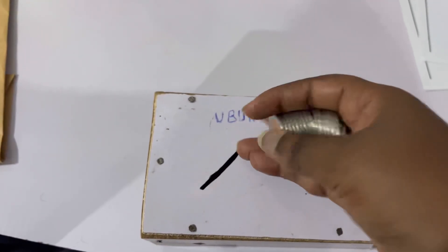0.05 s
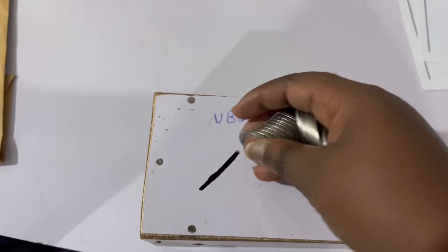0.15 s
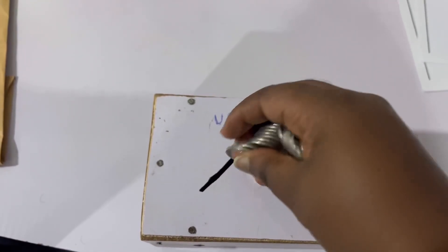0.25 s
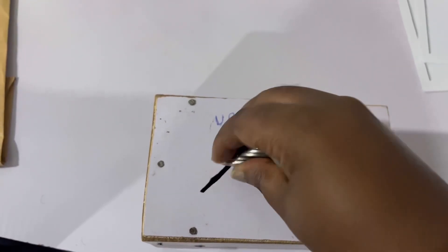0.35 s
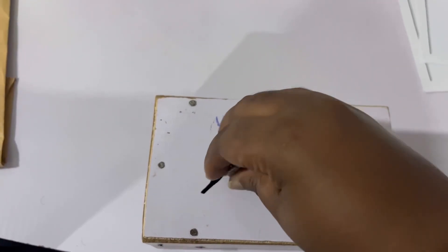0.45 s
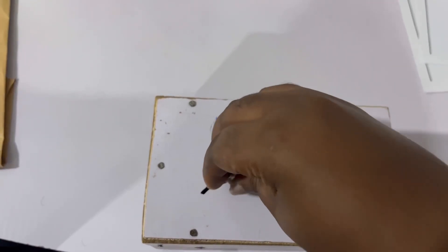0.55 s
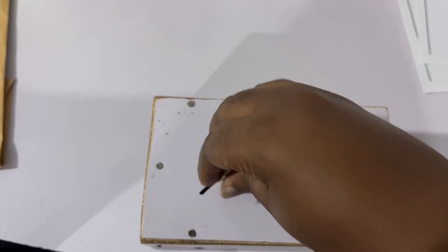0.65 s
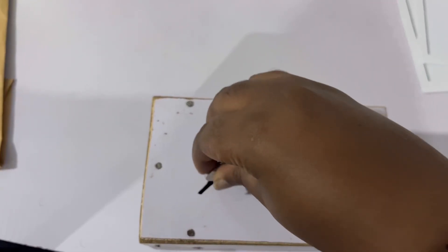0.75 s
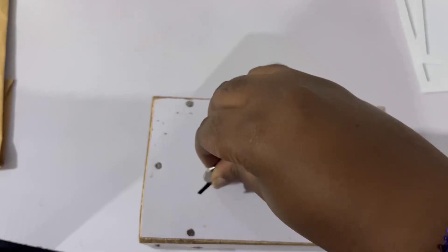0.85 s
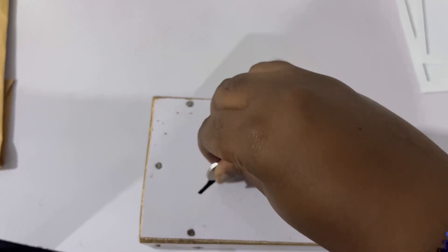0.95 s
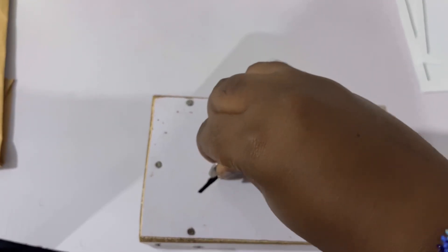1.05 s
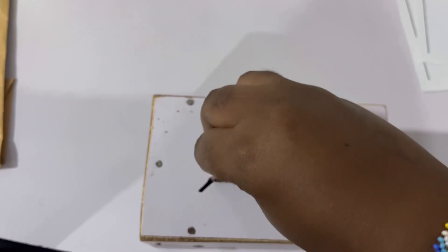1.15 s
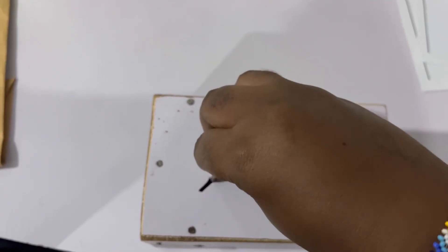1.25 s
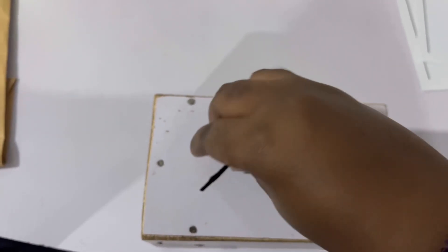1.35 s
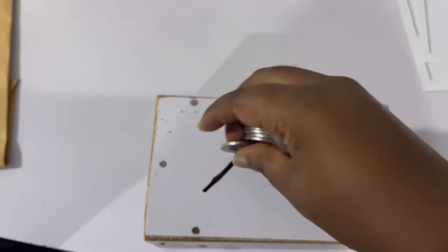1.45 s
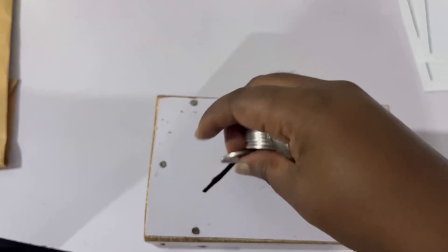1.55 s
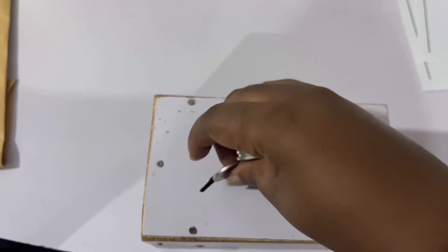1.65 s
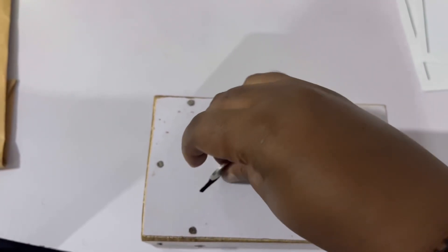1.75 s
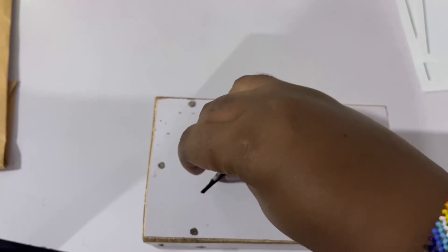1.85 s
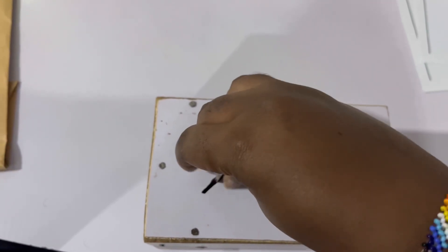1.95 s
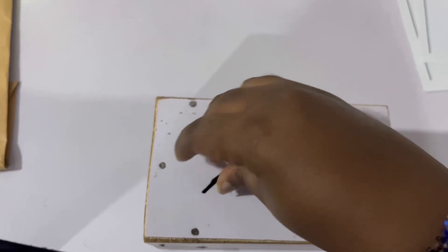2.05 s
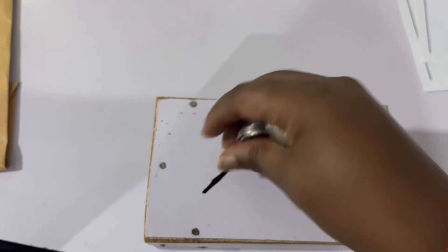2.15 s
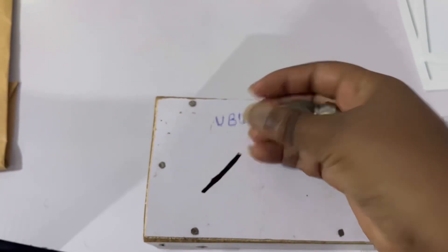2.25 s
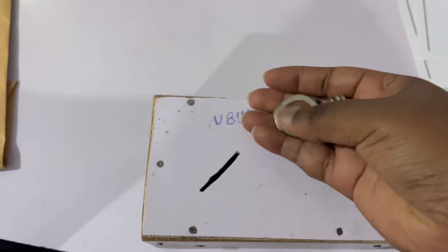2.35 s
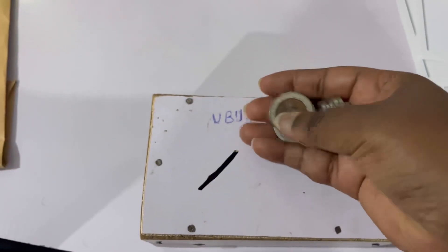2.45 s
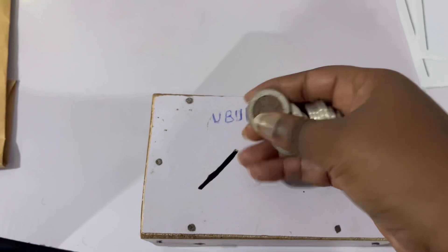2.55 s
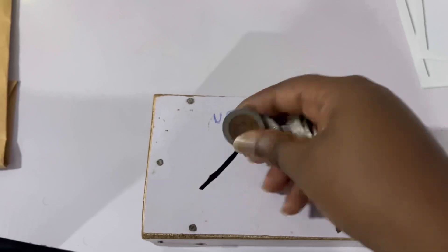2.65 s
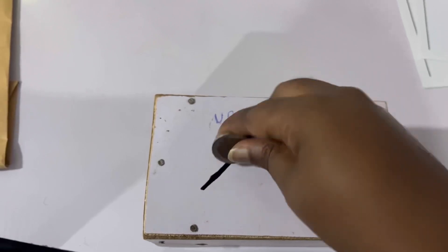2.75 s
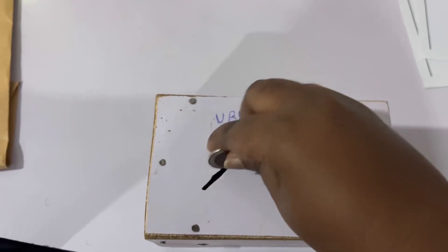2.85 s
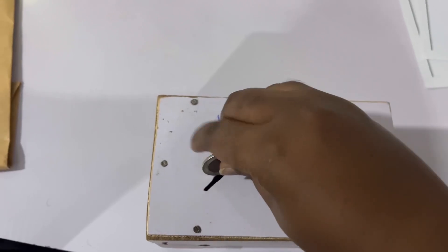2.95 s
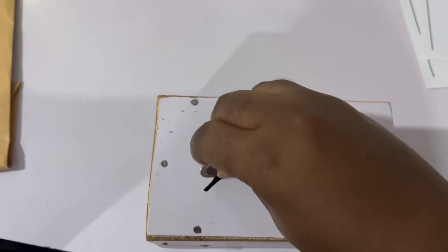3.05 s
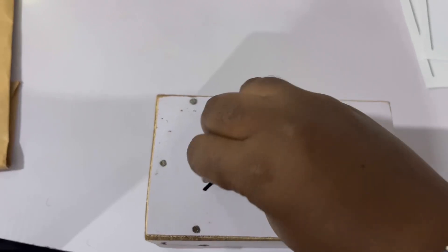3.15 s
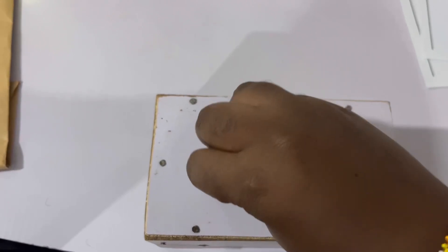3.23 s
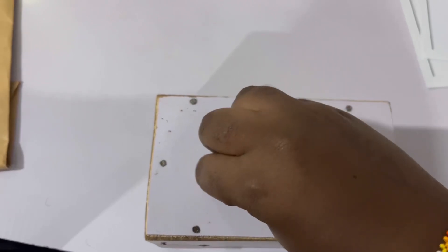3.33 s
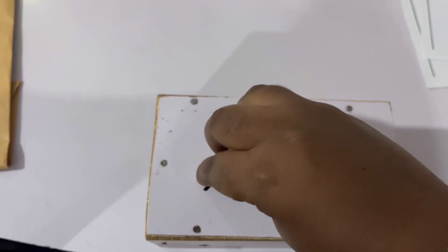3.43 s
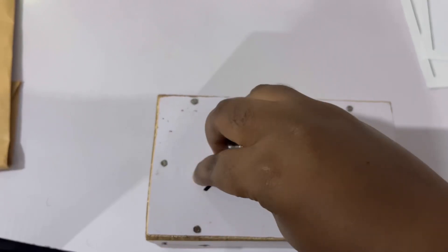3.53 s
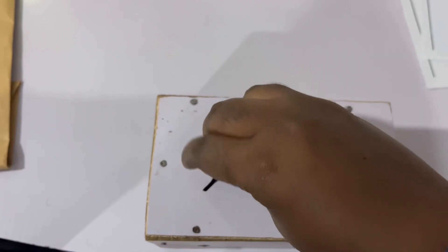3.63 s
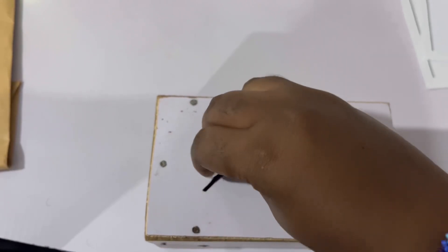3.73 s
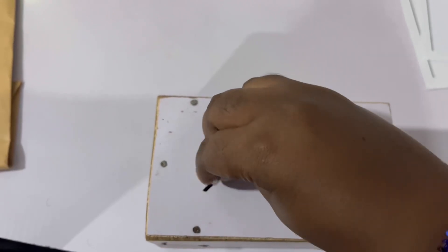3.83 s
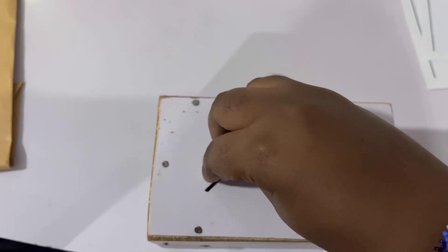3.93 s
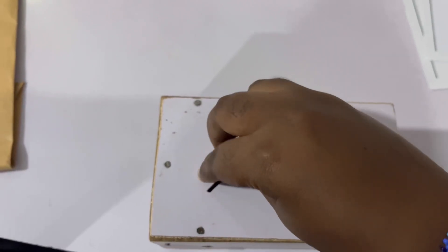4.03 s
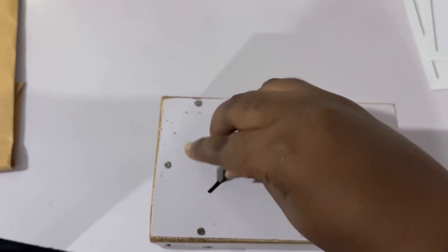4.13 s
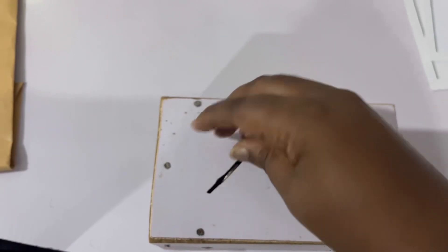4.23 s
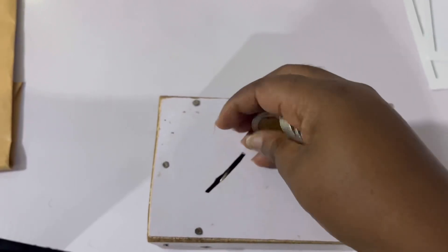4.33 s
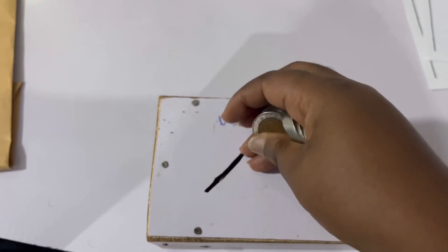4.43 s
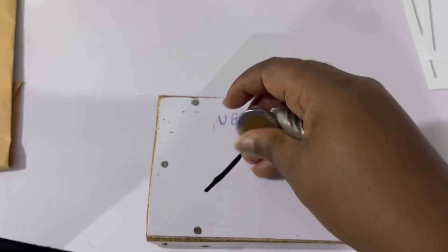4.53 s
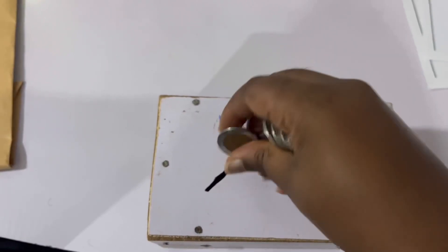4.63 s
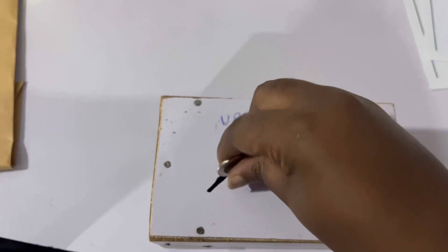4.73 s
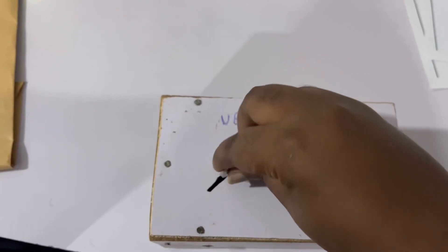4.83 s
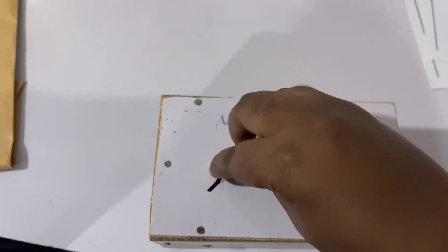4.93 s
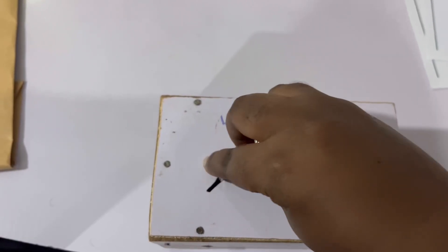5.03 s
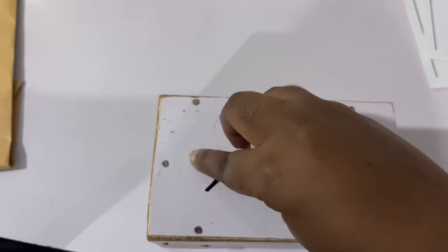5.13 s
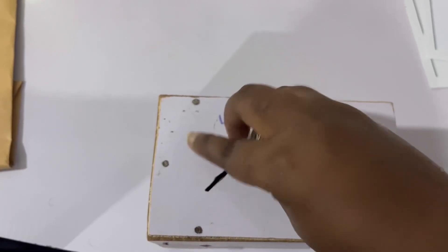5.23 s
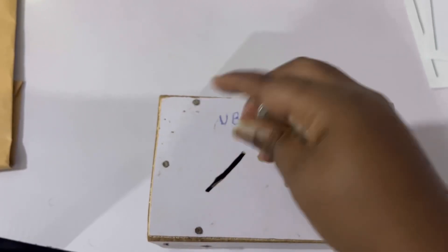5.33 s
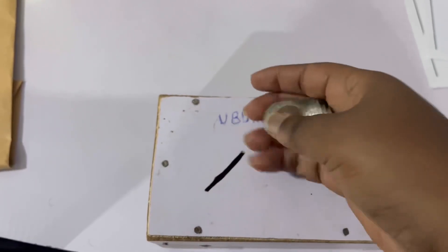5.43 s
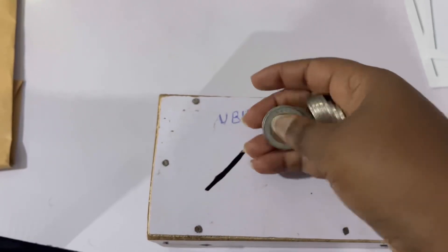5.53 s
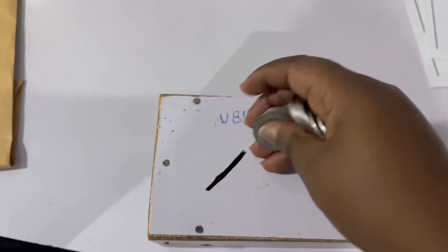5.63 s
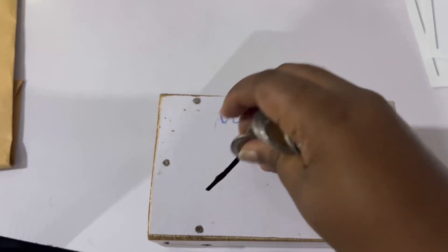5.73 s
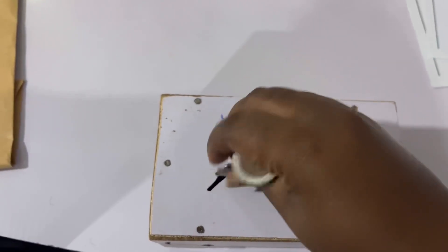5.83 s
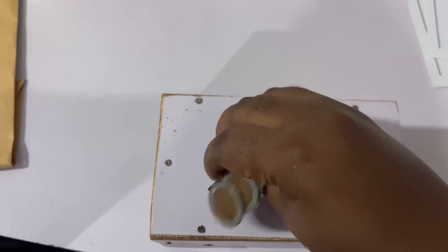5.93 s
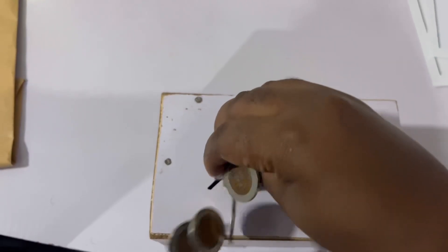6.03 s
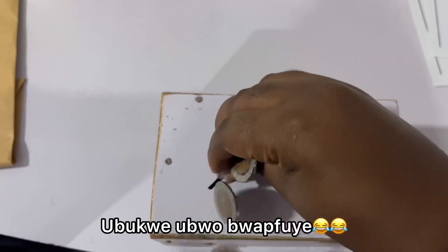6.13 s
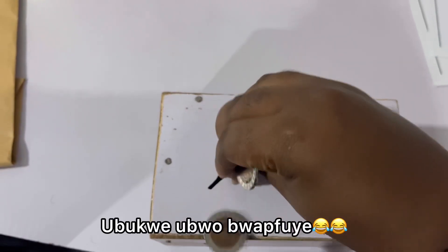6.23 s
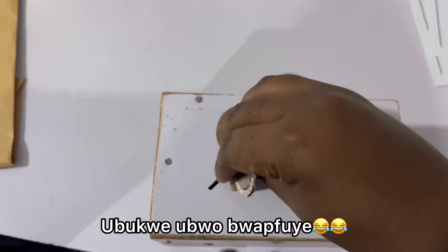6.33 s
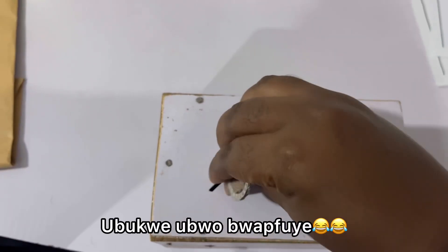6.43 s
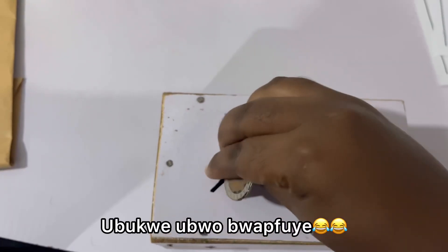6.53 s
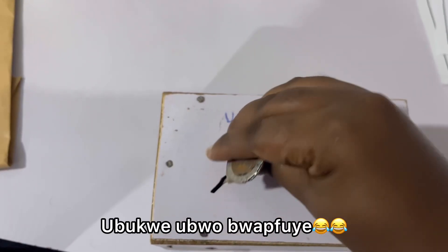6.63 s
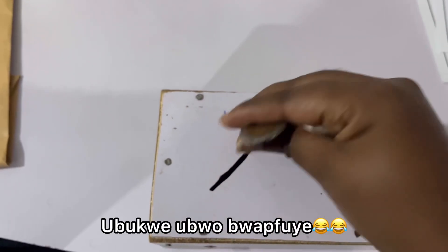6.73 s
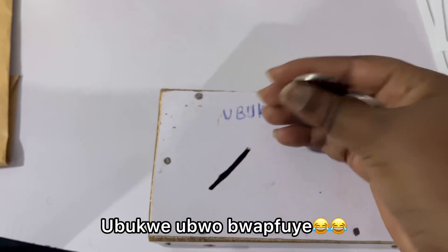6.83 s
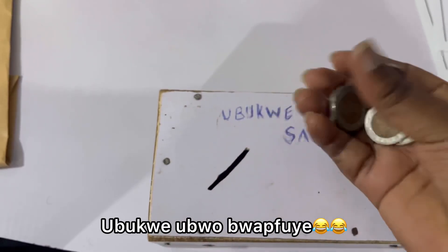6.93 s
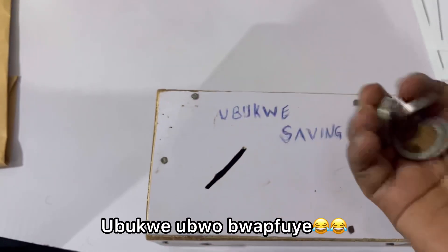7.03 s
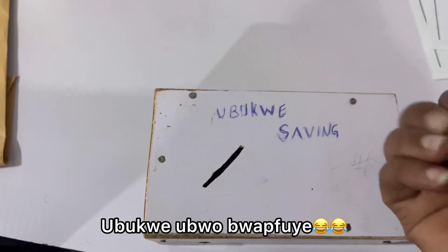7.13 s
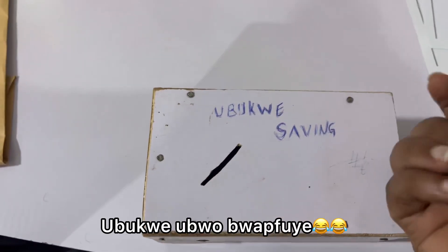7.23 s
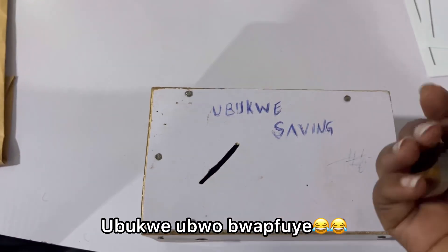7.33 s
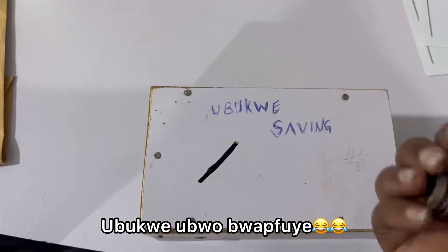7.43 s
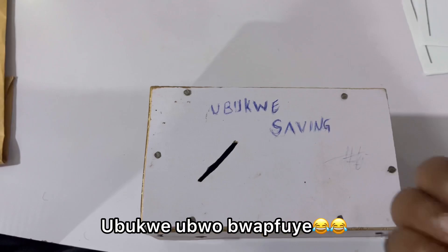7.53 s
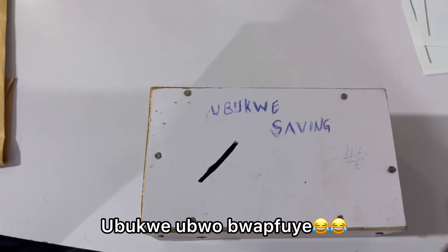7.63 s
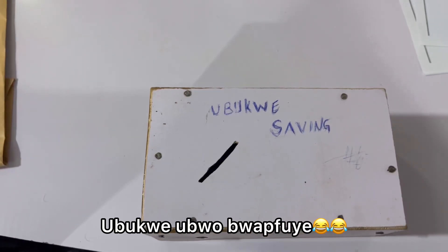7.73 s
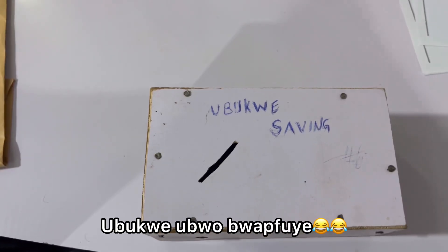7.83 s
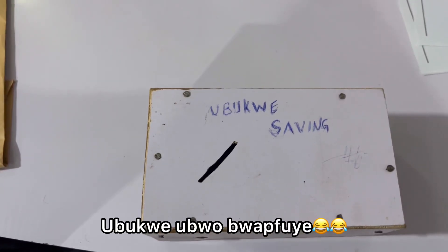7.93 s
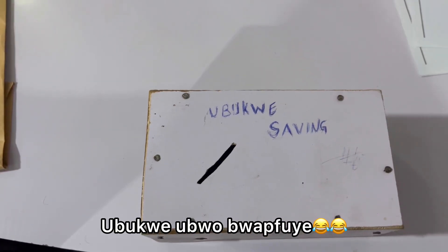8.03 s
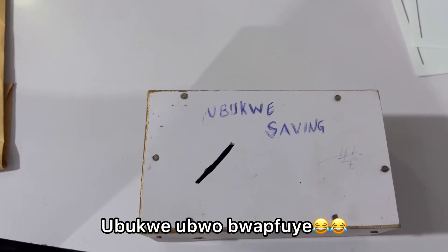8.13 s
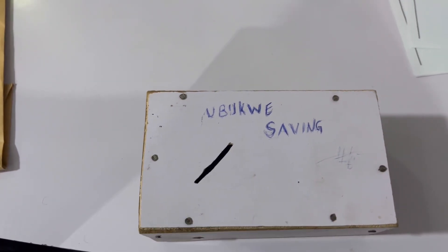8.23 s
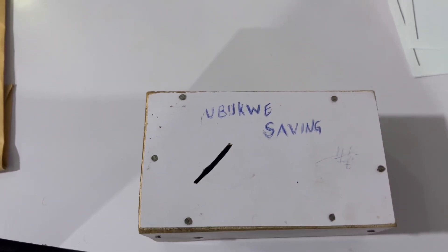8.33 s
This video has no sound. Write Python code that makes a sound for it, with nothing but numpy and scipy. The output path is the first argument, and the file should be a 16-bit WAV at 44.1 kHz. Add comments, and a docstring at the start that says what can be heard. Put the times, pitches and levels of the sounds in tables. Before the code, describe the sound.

In a quiet, low-humming room, coins tap and scrape on a thin plywood lid, slipping one at a time into a hollow box with short woody thuds and chatter. Small metallic clinks come from the palm between drops. Near six seconds several spill, cracking loudly on lid and desk. The remaining handful jingles brightly, then a few soft desk bumps end it. Close stereo microphone, short room reflections.

```python
"""Coins knock and scrape on the plywood lid of a small money box, land inside with a hollow thud and clink in the
palm; some spill and bounce on lid and desk, then the handful is jingled. A quiet room hums below.
Wood, hollow and coins are struck resonators; cracks, ticks and bumps use short noise puffs; scrapes and slides are
trains of tiny contacts. Decaying stereo noise is the room's answer to all but the desk bumps."""
import sys
import numpy as np
from scipy import signal
from scipy.fft import rfft, irfft, next_fast_len
from scipy.io import wavfile

SR = 44100
rng = np.random.default_rng(int(sys.argv[2]) if len(sys.argv) > 2 else 0)


def wav_record(signal):
    """Record a signal, one row per channel, as 16-bit PCM in the file named by sys.argv[1]."""
    frames = np.transpose(np.atleast_2d(signal))
    bounded = np.clip(frames, -1, 1)
    # unit amplitude maps onto the largest positive 16-bit level
    quanta = np.round(bounded * 32767).astype(np.int16)
    wavfile.write(sys.argv[1], SR, quanta)


N = 369540
PAD = next_fast_len(N + SR)
HZ = np.maximum(np.arange(PAD // 2 + 1) * SR / PAD, 1)

# Coin against the lid. Each row: start in seconds, wood level in dB, crack level in dB,
# level of the low modes against the rest in dB.
LID_KNOCKS = [(0.085, -35.5, -43, 2.5), (0.321, -11, -22, 1), (0.992, -3, -15.5, -36),
              (1.046, -26.5, -47, -12), (1.081, -21, -36, -7.5), (1.097, -21, -34, 3),
              (1.112, -9, -17.5, -11), (1.467, -31.5, -21, 2), (1.652, -14, -25, -4),
              (1.787, -18, -30.5, -0.5), (1.803, -24, -47, -14), (1.851, -22, -37, -3.5),
              (1.862, -18, -30, -5), (1.964, -20.5, -42.5, -4.5), (2.262, -38, -22, 7.5),
              (2.314, -28.5, -21, 0), (2.88, -15.5, -29, -2.5), (2.904, -14, -23.5, -0.5),
              (3.155, -10.5, -28.5, 0), (3.163, -15, -22, 1), (3.188, -17.5, -41, 0),
              (3.21, -20.5, -33.5, -2), (3.247, -24, -32, -7), (3.277, -20, -33, 2.5),
              (3.367, -14, -18.5, -2), (3.604, -19, -25.5, -1.5), (3.836, -20, -30, -3),
              (3.843, -6, -22, -11.5), (3.858, -20.5, -41, -4), (3.877, -12.5, -16.5, 1.5),
              (3.949, -27, -35, -12), (4.186, -27.5, -34, -9), (4.216, -18.5, -42, -6.5),
              (4.627, -34, -22, 4.5), (4.82, -12, -20, 1), (4.895, -26, -32, -1), (4.945, -27.5, -38, -7),
              (5.86, -11.5, -21.5, -2.5), (5.983, -14, -6, -12), (6.016, -2.5, -6, -9.5),
              (6.044, -2.5, -8, -17), (6.142, -2.5, -4, -11.5), (6.169, -12.5, -20, -0.5),
              (6.228, -5.5, -12, -3), (6.254, -9.5, -9.5, -6)]
# Coin landing inside the box. Each row: start in seconds, crack level in dB, boom level in dB.
BOX_LANDINGS = [(1.327, -10, -52.5), (2.057, -12, -56), (3.455, -13, -54), (4.23, -10, -56),
                (5.161, -14, -54.5), (6.376, -2, -71.5), (6.39, -5, -56)]
# Modes of the plywood lid. Each row: frequency in Hz, level in dB, t60 in seconds.
LID_MODES = [(290.7, -12.5, 0.072), (451.6, 1, 0.027), (570, -6, 0.03), (722.6, 2, 0.023),
             (802.4, -1.5, 0.047), (1046, -20, 0.056), (1200, -12.5, 0.014), (1642, -7.5, 0.035),
             (2335, -26, 0.0031)]
# Modes of the coins, each a little apart in pitch. Each row: frequency in Hz, level in dB,
# t60 in seconds before the grip alters it.
COIN_MODES = [(11850, -7, .05), (12700, -6, .05), (12970, 0, .1), (13030, -1, .1), (13120, -2, .1),
              (13380, -3, .08), (13450, -6, .06)]
# Tick of two coin edges. Each row: frequency in Hz, relative density in dB per Hz.
TICK_SPECTRUM = [(4000, -12), (5500, 7.5), (7500, 6.5), (9500, -3), (11500, -1.5), (13500, -6.5),
                 (14500, -6), (17000, -2)]


def from_db(db):
    """Gain of a level in dB."""
    return 10 ** (np.asarray(db) / 20)


def rms_one(x):
    """Scale to rms 1."""
    return x / np.sqrt(np.mean(x ** 2) + 1e-20)


def at_hz(points, hz, column=1):
    """Interpolate a table column on a log-frequency axis."""
    points = np.array(points)
    return np.interp(np.log(hz), np.log(points[:, 0]), points[:, column])


def colour(x, spectrum):
    """Shape by a spectrum scaled so that white noise keeps its power."""
    gain = rms_one(from_db(at_hz(spectrum, HZ)))
    return irfft(rfft(x, PAD) * gain, PAD)[..., :N]


def band(x, low_hz, high_hz):
    """Band-pass."""
    return signal.sosfilt(signal.butter(2, [low_hz, high_hz], "band", fs=SR, output="sos"), x)


def train(s, db):
    """One single-sample click per event."""
    clicks = np.full(N, 1e-18)
    np.add.at(clicks, (np.asarray(s) * SR).astype(int), from_db(db))
    return clicks


def dying(clicks, ms):
    """Exponential decay after each click, time constant in ms."""
    return signal.lfilter([1], [1, -np.exp(-1000 / (ms * SR))], clicks)


def bursts(clicks, ms):
    """Each click becomes a noise puff that swells for about 1 ms, then dies exponentially."""
    envelope = signal.lfilter(np.ones(50) / 50, 1, dying(clicks, ms))
    return envelope * rng.standard_normal(N)


def ring(x, hz, t60_s):
    """Two-pole resonator: a unit click sets a decaying sine of height 1 ringing."""
    r = from_db(-60 / (t60_s * SR))
    w = 2 * np.pi * hz / SR
    return signal.lfilter([0, np.sin(w)], [1, -2 * r * np.cos(w), r * r], x)


def body(x, modes, t60_scale=1):
    """Sum of the resonant modes of an object driven by one signal."""
    return sum(from_db(db) * ring(x, hz, t60_s * t60_scale) for hz, db, t60_s in modes)


def strike(modes, s, db, spread_db, ms=0, low_db=0, detune=0, damping=1):
    """Every blow lands elsewhere: random mode strengths, grip-shifted pitch, a click or a noisy contact."""
    chance = rng.standard_normal((len(s), len(modes)))
    grip = rng.integers(-1, 2, len(s)) if detune else np.zeros(len(s), int)
    out = 0
    for k, (hz, level_db, t60_s) in enumerate(modes):
        strength_db = db + level_db + spread_db * chance[:, k] + low_db * (hz < 620)
        for shift in np.unique(grip):
            chosen = grip == shift
            blows = train(s[chosen], strength_db[chosen])
            contact = bursts(blows, ms) if ms else blows
            out = out + (-1) ** k * ring(contact, hz * (1 + detune * shift), t60_s / damping)
    return out


def grains(per_s, spread_db):
    """Tiny contacts at random moments, of uneven size and random sign; rms 1."""
    sizes = from_db(spread_db * np.minimum(rng.exponential(1, N), 4)) * rng.choice([-1, 1], N)
    return rms_one(sizes * (rng.random(N) < per_s / SR))


def settling(s, db, ms, per_s):
    """After a hit the coins rock and slide: small contacts that die away."""
    return dying(train(s, db), ms) * grains(per_s, spread_db=1.5)


def strokes(start_s, length_s, db):
    """Gain over time: each stroke rises fast, holds and fades."""
    gain = np.zeros(N)
    for s, length, level_db in zip(start_s, length_s, db):
        place = np.linspace(0, 1, int(length * SR))
        shape = np.interp(place, [0, .1, .6, 1], [0.17, 0.9, 0.63, 0.076])
        first = int(s * SR)
        gain[first:first + len(shape)] += from_db(level_db) * shape[:N - first]
    return gain


def diffuse(length):
    """Stereo white noise whose left-right correlation varies with frequency."""
    # Each row: frequency in Hz, left-right correlation.
    likeness = [(60, 1), (500, 0.84), (2500, 0.033), (4800, 0.062), (5500, 1), (16000, 1)]
    mid, side = rfft(rng.standard_normal((2, length)))
    hz = np.maximum(np.arange(len(mid)) * SR / length, 1)
    alike = np.clip(at_hz(likeness, hz), -1, 1)
    pair = np.sqrt(1 + alike) * mid + np.sqrt(1 - alike) * side * [[1], [-1]]
    return irfft(pair, length) / np.sqrt(2)


def room_tone():
    """Steady low-weighted hum of the room: coloured diffuse noise."""
    # Each row: frequency in Hz, relative density in dB per Hz.
    tone_spectrum = [(25, -32.5), (50, 6), (75, -9), (110, -2), (200, -20), (900, -28.5), (1600, -21.5),
                     (2600, -31.5), (4500, -26.5), (9500, -40), (13000, -42.5), (16000, -54.5)]
    return from_db(-48) * colour(diffuse(N), tone_spectrum)


def reflections():
    """Room response: half-octave noise bands, each with its own decay, after a 2 ms gap."""
    # Each row: frequency in Hz, t60 in seconds, level in dB.
    room_decay = [(150, 0.64, 4), (402, 0.7, -0.5), (1000, 0.53, -1.5), (2180, 0.43, 0.5), (5070, 0.21, 7),
                  (9100, 0.25, -0.5), (13330, 0.17, 0.5)]
    length = SR // 2
    t = np.arange(length) / SR
    noise = diffuse(length)
    edges_hz = 60 * 2 ** np.arange(0, 8.1, .5)
    tail = 0
    for low, high in zip(edges_hz, np.minimum(np.sqrt(2) * edges_hz, 19000)):
        hz = np.sqrt(low * high)
        t60_s = at_hz(room_decay, hz)
        decay = from_db(at_hz(room_decay, hz, column=2) - 60 * t / t60_s)
        tail = tail + band(noise, low, high) * decay * np.sqrt(14 / (t60_s * SR))  # decay energy near 1
    return tail * np.clip((t - .002) / 0.00025, 0, 1)


def room(x, count=4):
    """The moving hand changes the sound paths: the input takes turns among a few reflection patterns."""
    hand_moves_s = .17
    turn = (np.arange(N) / (hand_moves_s * SR)).astype(int) % count
    wet = sum(rfft(reflections(), PAD) * rfft(x * (turn == k), PAD) for k in range(count))
    return irfft(wet, PAD)[:, :N]


def bumps():
    """Soft desk bumps: a hollow two-mode tap with a small crack, then a low thump through the desk."""
    # Each row: start in seconds, tap level in dB, thump level in dB.
    bump_rows = [(7.935, -25.5, -23.5), (7.947, -24.5, -42), (8.326, -34.5, -51), (8.359, -35.5, -35)]
    crack_db, thump_late_s = -1, .013  # crack against the tap
    s, tap_db, thump_db = np.transpose(bump_rows)
    touch = train(s, tap_db)
    tap = ring(touch, 445, 0.028) + 0.45 * ring(bursts(touch, ms=1.8), 1060, 0.013)
    crack = band(bursts(train(s, tap_db + crack_db), ms=1.8), 950, 5000)
    thump_s = np.minimum(s + thump_late_s, (N - 1) / SR)
    return tap + crack + ring(train(thump_s, thump_db), hz=57.8, t60_s=0.22)


def free_rings():
    """A loose coin spins free and sings one clear mode; the lines flutter as the discs turn."""
    # Each row: start in seconds, pitch in Hz, level in dB, t60 in seconds.
    ring_rows = [(5.983, 13015, -25, .55), (6.044, 13434, -38, 1.5), (6.176, 13370, -34, .35),
                 (6.259, 13118, -49, 2.0), (6.566, 13117, -45, 1.8), (7.634, 13370, -41, .3),
                 (7.634, 12985, -41, .35), (7.741, 12954, -36, .7), (7.832, 12940, -30, .55),
                 (8.015, 12910, -40, 1.1)]
    flutter = 1 + .5 * rms_one(band(rng.standard_normal(N), 10, 70))
    return flutter * sum(ring(train([s], db), hz, t60_s) for s, hz, db, t60_s in ring_rows)


def desk_hits():
    """Spilled coins hit the desk: a dry thud dying within a few cycles, a crack and a low rumble."""
    # Each row: start in seconds, thud level in dB, crack level in dB, thud pitch in Hz.
    hit_rows = [(6.215, 5, -6, 740), (6.221, 4, -24, 1200), (6.233, -3, -17.5, 467), (6.417, 7, 0, 530),
                (6.538, -6, -29, 1000), (6.556, 6.5, -5.5, 740), (6.564, -0.5, -28, 930),
                (6.611, 0, -19, 560)]
    thud_cycles, rumble_db = 6.4, -17.5  # cycles to fall 60 dB; rumble against the thud
    s, thud_db, crack_db, _ = np.transpose(hit_rows)
    thud = sum(ring(train([t], db), hz, thud_cycles / hz) for t, db, _, hz in hit_rows)
    rumble = band(bursts(train(s, thud_db + rumble_db), ms=33.6), 233, 630)
    crack = band(bursts(train(s, crack_db), ms=5.0), 700, 4440)
    return band(thud, 236, 2500) + rumble + crack


def shuffles():
    """Coins slide over one another: one stream of small contacts, heard dull, bright and as disc ring."""
    # Each row: start in seconds, length in seconds, level in dB.
    shuffle_rows = [(0.1, 0.2, -42), (1.42, 0.11, -34), (2.222, 0.16, -32), (2.445, 0.35, -51),
                    (4.297, 0.29, -47), (4.494, 0.34, -43), (5.477, 0.25, -38.5), (5.948, 0.21, -31),
                    (6.135, 0.25, -35), (6.37, 0.041, -21), (6.474, 0.2, -29.5), (6.63, 0.68, -48.5),
                    (7.027, 0.11, -28), (7.192, 0.2, -38), (7.385, 0.066, -30.5), (7.494, 0.24, -39.5),
                    (7.732, 0.27, -43), (7.824, 0.17, -38.5), (7.967, 0.36, -44)]
    # Colour while gripped, spilled, jingled. Each row: from in seconds, then dull chatter,
    # bright tick and ring in dB against the shuffle level.
    handful = [(0, -1.5, -28, -17), (5.95, 1.5, -30, -14), (7.0, -9, 1, -1.5)]
    # A landed coin slides on the pile: dull chatter, bright tick and ring levels in dB.
    pile_slide_db = (-35.5, -40, -37)
    pile_slide_s, spill_s = .08, 5.95  # slide length; coins lie loose and ring freely from the spill on
    rows = []
    for s, length, db in shuffle_rows:
        layers_db = [h for h in handful if h[0] <= s][-1][1:]
        rows.append((s, length, *(db + np.array(layers_db))))
    rows += [(s, pile_slide_s, *pile_slide_db) for s, *_ in BOX_LANDINGS]
    start_s, length_s, *levels_db = np.transpose(rows)
    slide = bursts(np.abs(grains(460, spread_db=5.0)) + 0.032, ms=1.6)
    held = rms_one(body(slide, COIN_MODES, t60_scale=.15))
    loose = rms_one(body(slide, COIN_MODES, t60_scale=1.3))
    chime = np.where(np.arange(N) < spill_s * SR, held, loose)
    layers = band(slide, 1100, 5600), colour(slide, TICK_SPECTRUM), chime
    return sum(strokes(start_s, length_s, db) * rms_one(x) for db, x in zip(levels_db, layers))


def scrapes():
    """A coin edge or finger drags on the lid: uneven slips, in clumps, set the wood ringing."""
    # Each row: start in seconds, length in seconds, level in dB.
    scrape_rows = [(0.09, 0.14, -55), (0.516, 0.74, -47), (1.035, 0.077, -30), (1.574, 0.93, -48.5),
                   (2.733, 0.14, -50), (3.144, 0.16, -31), (3.342, 0.084, -36), (3.644, 0.4, -39),
                   (3.893, 0.25, -41), (4.128, 0.084, -39), (4.827, 0.24, -38), (5.49, 0.27, -43),
                   (5.988, 0.13, -26), (6.152, 0.17, -28.5)]
    rub = band(bursts(np.abs(grains(110, spread_db=6.0)) + 0.074, ms=2.6), 230, 1900)
    return strokes(*np.transpose(scrape_rows)) * rms_one(body(rub, LID_MODES))


def clinks():
    """Coin on coin: edges tick and chatter on; the discs ring high, rough and short between the fingers."""
    # Each row: start in seconds, touch level in dB, ring level in dB.
    clink_rows = [(0.105, -29.5, -54), (0.166, -25.5, -73), (0.6826, -30, -83), (1.488, -32, -42),
                  (2.1577, -33, -55), (2.204, -34.5, -70), (2.2345, -30, -43), (2.2828, -17, -42),
                  (2.368, -26.5, -51), (2.39, -34, -55), (2.453, -26, -89), (2.465, -25.5, -69),
                  (2.5512, -30, -80), (3.455, -31, -42), (3.991, -33, -56), (4.14, -30.5, -49),
                  (4.3199, -22, -39.5), (4.5522, -27.5, -67), (4.586, -41, -70), (4.6114, -26, -56),
                  (4.6676, -25, -34), (5.4082, -22, -54), (5.517, -23, -39), (5.5844, -25.5, -46.5),
                  (5.7402, -29.5, -55.5), (5.857, -18.5, -44), (5.981, -16, -38), (6.014, -13, -38),
                  (6.0425, -11, -44), (6.094, -32, -48), (6.256, -10, -60.5), (6.5165, -10.5, -46),
                  (6.566, -18.5, -46), (6.8159, -31, -56), (6.827, -36, -66), (7.0287, -32, -50),
                  (7.0373, -16, -48), (7.06, -14.5, -31.5), (7.1149, -14.5, -29.5), (7.1675, -14, -37),
                  (7.194, -14, -39), (7.199, -14.5, -42), (7.2174, -17, -42), (7.3759, -28.5, -41.5),
                  (7.3896, -22, -36), (7.41, -18, -59), (7.4697, -21.5, -49), (7.5067, -19, -35.5),
                  (7.5194, -15, -35), (7.633, -24, -47), (7.74, -30, -42), (7.7597, -27, -46),
                  (7.831, -17.5, -37.5), (7.934, -22, -55), (7.978, -37, -48), (8.0136, -23, -35),
                  (8.092, -36, -45), (8.1337, -31, -55)]
    edge_gain, chatter_db = 4.7, -11  # clean first click; chatter against the clink
    s, touch_db, ring_db = np.transpose(clink_rows)
    clicks = train(s, touch_db)
    chatter = settling(s, touch_db + chatter_db, ms=14, per_s=450)
    touch = bursts(clicks, ms=2.8) + edge_gain * clicks + chatter
    chime = strike(COIN_MODES, s, ring_db, spread_db=4.5, ms=2.05, damping=3.3)
    return colour(touch, TICK_SPECTRUM) + 1.04 * band(touch, 2590, 4900) + chime


def landings():
    """A brief knock of the walls, chatter on the pile and a boom that swells in the hollow."""
    # Air in the box and the desk under it. Each row: frequency in Hz, level in dB,
    # t60 in seconds before damping.
    hollow_modes = [(103, -1.5, 0.46), (144.6, -4.5, 0.86)]
    pile_db, walls_db = -20.5, -9.5  # against the crack
    s, crack_db, boom_db = np.transpose(BOX_LANDINGS)
    pile = band(settling(s, crack_db + pile_db, ms=92, per_s=1300), 1500, 4200)
    boom = band(strike(hollow_modes, s, boom_db, spread_db=1.5, ms=57, damping=3.2), 62, 210)
    walls = strike(LID_MODES, s, crack_db + walls_db, spread_db=3.5, low_db=1.0)
    return pile + walls + boom


def cracks():
    """Metal on a hard surface at each knock and landing: noise puffs direct, single clicks to the room."""
    # Each row: frequency in Hz, relative density in dB per Hz.
    crack_spectrum = [(200, -18.5), (500, -2), (1200, 3.5), (3000, 4.5), (4600, -5.5), (7000, -4.5),
                      (9500, -16), (13000, -12.5), (16000, -41)]
    room_click_db = 19  # one click of this size stands for a whole crack in the room
    events = [(s, db) for s, _, db, _ in LID_KNOCKS] + [(s, db) for s, db, _ in BOX_LANDINGS]
    s, db = np.transpose(events)
    direct = colour(bursts(train(s, db), ms=4.4), crack_spectrum)
    return direct, colour(train(s, db + room_click_db), crack_spectrum)


def knocks():
    """The lid rings under a short soft contact and a brief rattle."""
    rattle_db = -40.5  # against the knock
    s, wood_db, _, low_db = np.transpose(LID_KNOCKS)
    wood = strike(LID_MODES, s, wood_db, spread_db=2.5, low_db=low_db, detune=0.027)
    rattle = settling(s, wood_db + rattle_db, ms=10.0, per_s=270)
    wood = wood + body(rattle, LID_MODES)
    soft = signal.lfilter(np.hanning(18) / 8, 1, wood)
    return band(soft, 220, 8000)  # a small panel radiates no bass


def scene():
    """Struck things sound direct and through the room; the bumps come through the desk alone."""
    # Right channel against the left as the hand moves. Each row: time in seconds, gain in dB.
    hand_side = [(6.301, 1), (7.6, -1)]
    lid_room_db, clink_room_db = -5.5, -3  # the lid sends less than the cracks; the hand is close
    crack, crack_sent = cracks()
    lid = knocks() + scrapes()
    ticks = clinks()
    rest = desk_hits() + landings() + shuffles() + free_rings()
    sent = from_db(lid_room_db) * lid + from_db(clink_room_db) * ticks + crack_sent + rest
    out = lid + crack + ticks + rest + room(sent) + bumps()
    out[1] *= from_db(np.interp(np.arange(N) / SR, *np.transpose(hand_side)))
    return out + room_tone()


def record(dry):
    """All-pass filters delay the bass, the right side gets its level and phase, peaks clip, both ends are cut."""
    # Right microphone against the left. Each row: frequency in Hz, level in dB.
    right_level = [(100, -1), (300, 3.5), (1000, 0.6), (5000, 2.5), (8000, 0)]
    # Right microphone against the left. Each row: frequency in Hz, phase in radians.
    right_phase = [(0, -0.22), (600, 1.48), (1600, 0), (2600, -1.52), (3600, -6), (4650, -5.5),
                   (5250, -8.5), (6630, -10), (13200, -20), (16000, -22)]
    late_hz, width_hz = 350, 400
    r = np.exp(-np.pi * width_hz / SR)
    poles = [1, -2 * r * np.cos(2 * np.pi * late_hz / SR), r * r]
    late = signal.sosfilt([poles[::-1] + poles] * 2, dry)
    phase_rad = np.interp(HZ, *np.transpose(right_phase))
    turn = from_db(at_hz(right_level, HZ)) * np.exp(1j * phase_rad)
    right = irfft(rfft(late[1], PAD) * turn, PAD)[:N]
    clipped = np.clip(np.array([late[0], right]), -1, 1)
    no_bass = signal.sosfilt(signal.butter(4, 36, "high", fs=SR, output="sos"), clipped)
    return signal.sosfilt(signal.cheby2(10, 50, 16700, fs=SR, output="sos"), no_bass)


dry = scene()
out = record(dry)
wav_record(out)
```